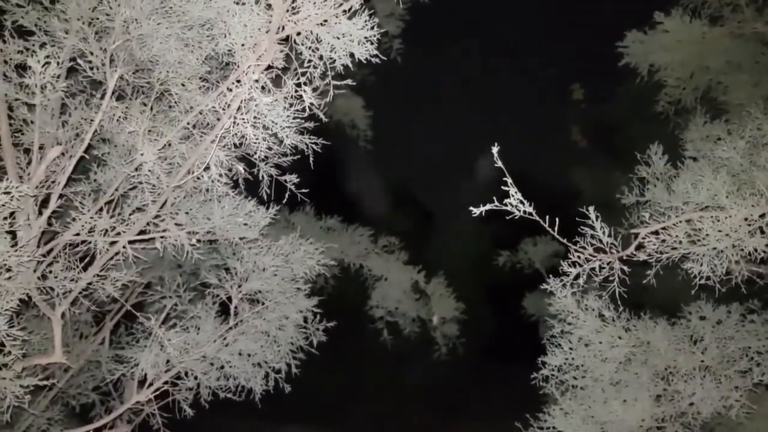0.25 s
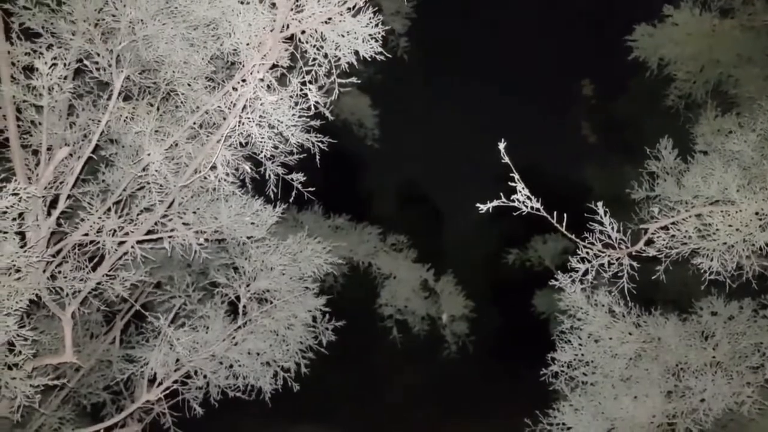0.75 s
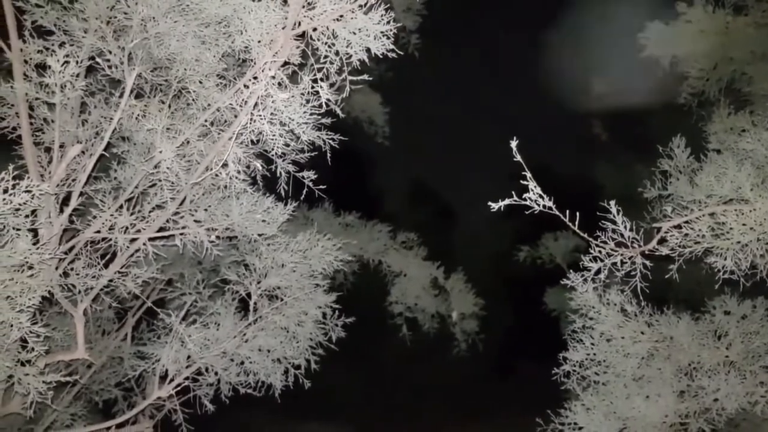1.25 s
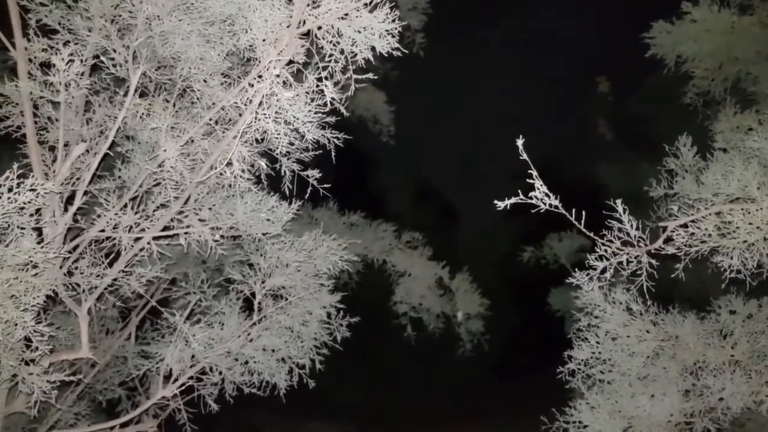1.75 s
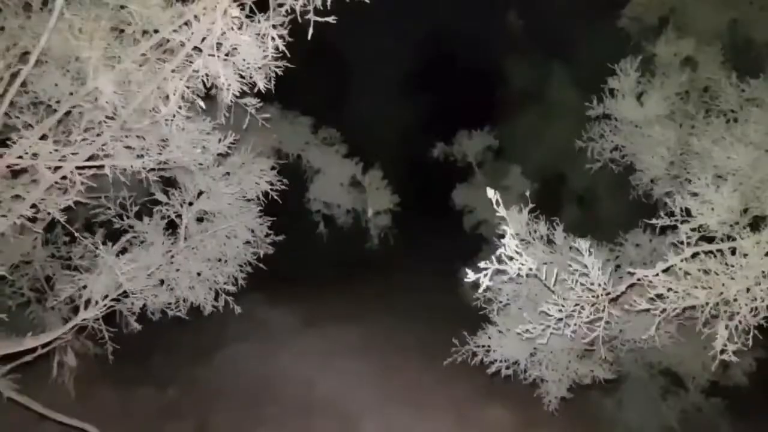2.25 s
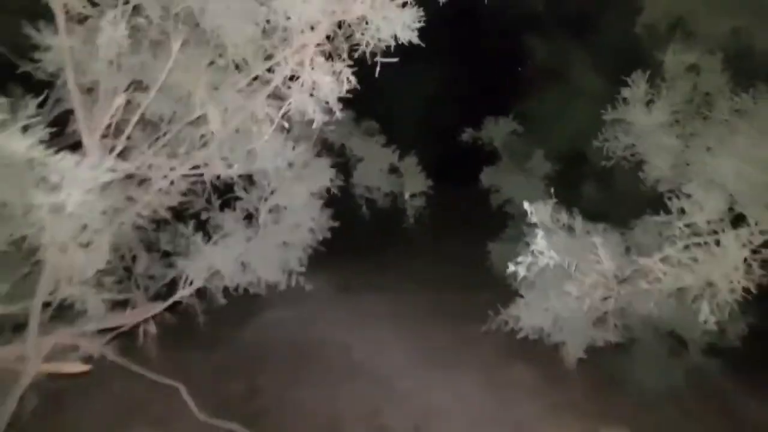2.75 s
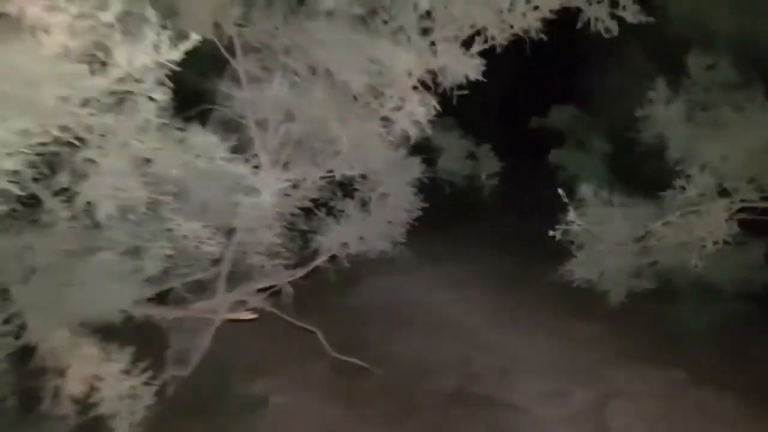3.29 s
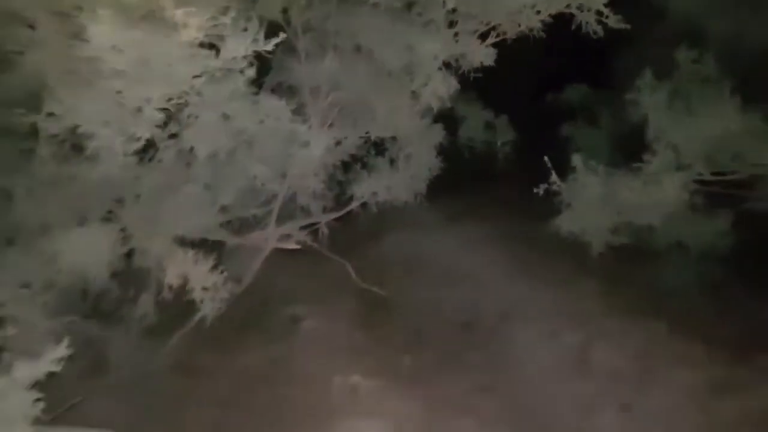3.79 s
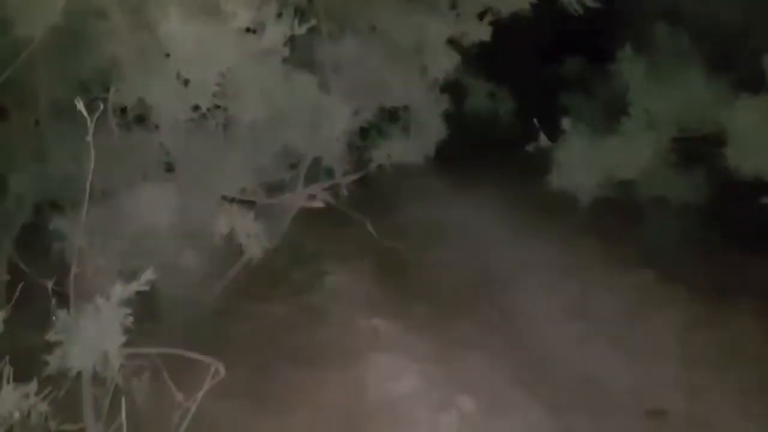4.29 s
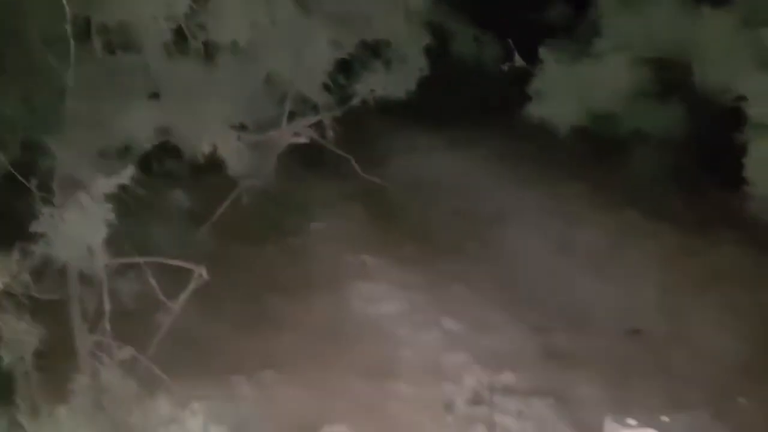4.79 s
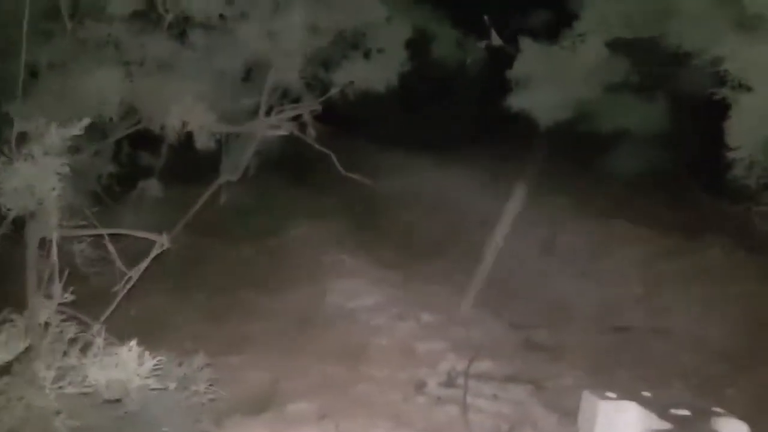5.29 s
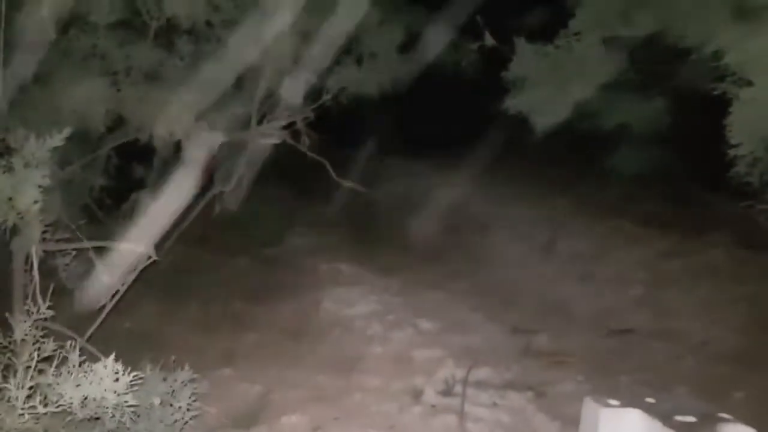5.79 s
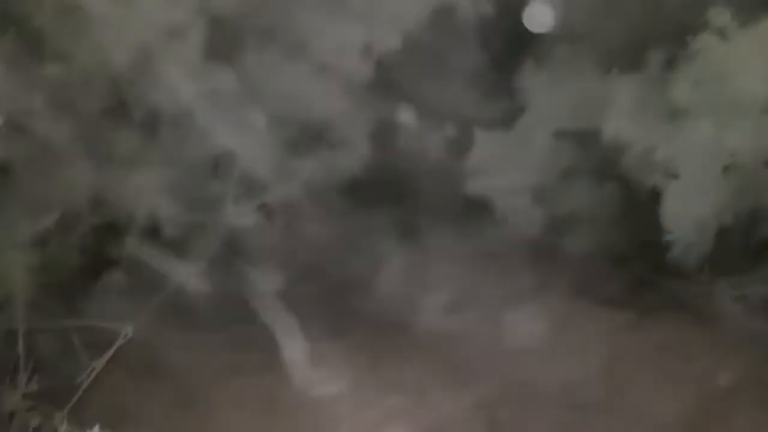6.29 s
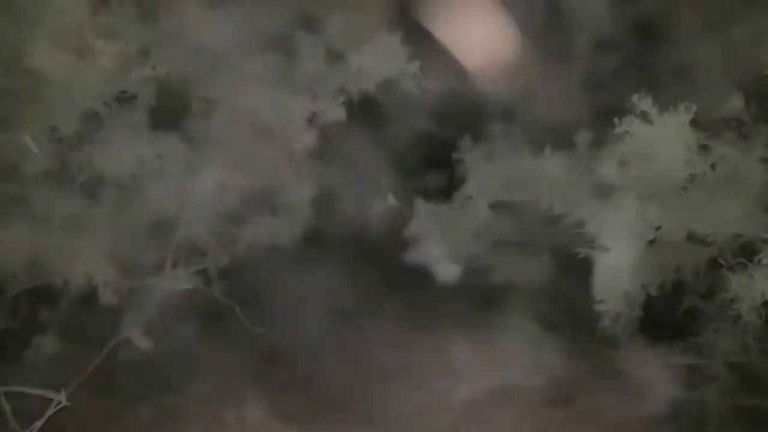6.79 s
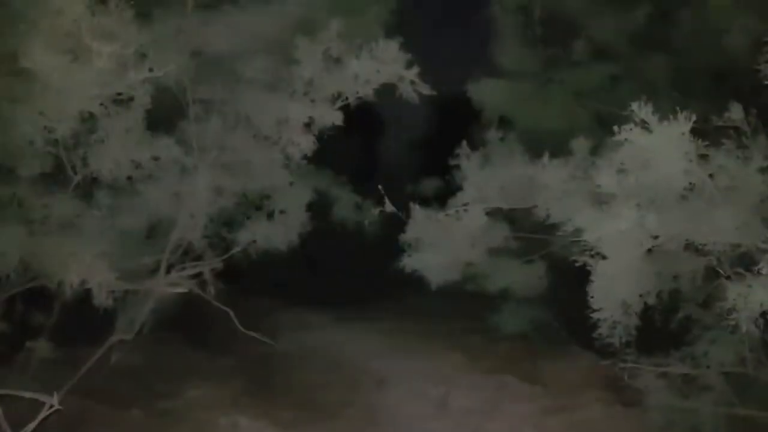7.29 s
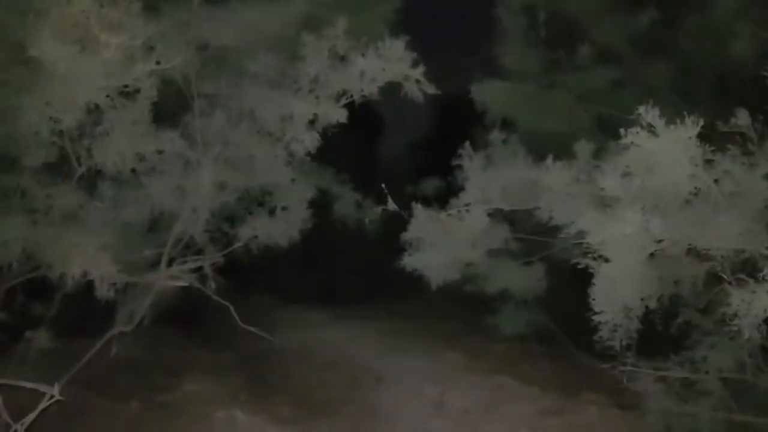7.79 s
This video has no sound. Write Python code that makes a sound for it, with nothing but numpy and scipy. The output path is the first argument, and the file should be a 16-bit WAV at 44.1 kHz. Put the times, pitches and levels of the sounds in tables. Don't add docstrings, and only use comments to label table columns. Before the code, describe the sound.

A quiet night pond among trees, heard in mono with soft air and microphone hiss. Throughout 0-8 s a blurred far crowd of frogs shimmers fast around 2-4 kHz, over a steady low cricket trill near 2 kHz, about 55 pulses a second, and a faint buzzing katydid above 10 kHz. A near peeper repeats bouts of about three to six clear whistles falling from nearly 5 to 4 kHz, roughly twice every 1.2 s. Shorter, quicker whistles cluster at 1.9-3.5 s, then scatter. Click frogs croak and tick busily until 4 s, more thinly to 6.7 s. A lower peeper gives five-note bouts at 0.2-1.7, 3.6-4.3 and after 7.4 s. Soft deeper croaks come at 1.2, 4.1-4.7 and around 6 s. A high cricket sings faintly 1.4-4.2 s and after 6.4 s; another chirps slowly. Very faint low callers appear from 5.7 s; one fuller call sounds at 7.2 s.

```python
import sys
import numpy as np
from scipy import signal
from scipy.fft import rfft, irfft
from scipy.io import wavfile
from scipy.ndimage import uniform_filter1d

SR = 44100
rng = np.random.default_rng(int(sys.argv[2]) if len(sys.argv) > 2 else 0)


def master_out(mix):
    frames = np.transpose(np.atleast_2d(mix))
    ceiling = np.clip(frames, -1, 1)
    pcm = np.round(ceiling * 32767).astype(np.int16)
    wavfile.write(sys.argv[1], SR, pcm)


N = 355005

# [f/Hz, level/dB per Hz]
AIR_COLOUR = [(20, -15), (40, -8), (70, -6.5), (135, 0), (250, -4.5), (500, -6), (800, -8.5), (1700, -5.5),
              (3200, -3.5), (5200, -9), (6200, -11.5), (7500, -23.5), (9500, -19.5), (15500, -24.5)]
# [f/Hz, width/Hz, level/dB]
WING_MODES = [
    (10790, 700, -3),
    (12000, 1000, -0.5),
    (13300, 900, -3),
    (14600, 880, -3),
]
# [t/s, strokes ahead of an even beat]
KATYDID_DRIFT = [(0, 0.31), (1.4, 1.05), (3.65, 3.05), (6.3, 2.5), (8.05, 1.47)]
# [t/s, strokes ahead of an even beat]
LOW_CRICKET_DRIFT = [(0, -0.78), (1.4, -0.31), (3.5, 0.53), (4.65, -0.89), (7, -.76), (7.7, -1.58),
                     (8.05, -1.6)]
# [first t/s, last t/s, strokes per s, level/dB]
HIGH_CRICKET_BOUTS = [(1.443, 1.51, 70, -76), (1.669, 1.824, 71, -75), (1.957, 2.212, 70.6, -74),
                      (2.356, 2.611, 70.2, -73), (2.730, 3.005, 69.2, -75), (3.153, 3.4, 68.9, -73),
                      (3.527, 3.805, 68.6, -73), (3.942, 4.233, 68.6, -72), (6.423, 6.61, 70, -77),
                      (6.765, 6.94, 69.5, -76), (7.098, 7.23, 69.7, -76), (7.313, 7.4, 69, -77),
                      (7.578, 7.77, 69.5, -76), (7.997, 8.045, 70, -76)]
SLOW_CHIRPS = [.525, 1.07, 2.878, 3.675, 4.315, 4.988, 5.622, 6.92, 7.59]
# [t/s, peepers level/dB, ticks level/dB, croaks level/dB]
CROWD_LEVELS = [(0.0, -54, -57, -67), (1.3, -53, -57.5, -66), (2.38, -52, -57.5, -69),
                (5.99, -52.5, -58.5, -67), (8.05, -52.5, -60, -70)]
# [t/s, f/Hz, fall/ms, level/dB]
FAR_CALLS = [
    (5.70, 460, 34, -73),
    (6.04, 517, 20, -72),
    (7.215, 800, 20, -70),
    (7.345, 860, 14, -71.5),
    (7.405, 530, 16, -69),
    (7.575, 548, 63, -73),
]
# [t/s, level/dB]
DEEP_CROAKS = [(1.195, -65.5), (4.113, -63.5), (4.474, -66), (4.709, -69), (5.896, -65.5), (6.168, -67),
               (6.212, -68)]
# [first tick t/s, last tick t/s, tick level/dB, croak level/dB]
DULL_RUNS = [(.068, .578, -43, -48.5), (.350, .350, -35, -58), (.641, 0.86, -34.5, -49.5),
             (.742, 1.17, -36, -55), (.911, 1.23, -37.5, -51), (1.194, 1.305, -32.5, -49),
             (1.242, 1.36, -44, -49), (1.458, 1.67, -52, -50), (1.760, 1.96, -37.5, -52),
             (1.822, 2.1, -48, -51), (2.050, 2.68, -36, -50.5), (2.459, 3.23, -37.5, -52),
             (2.662, 3.17, -39, -54), (3.032, 3.52, -33, -54), (3.419, 4, -35, -55),
             (4.078, 4.078, -35, -61), (4.240, 4.240, -54, -52), (5.572, 5.572, -36, -46.5),
             (6.169, 6.412, -32, -51), (6.538, 6.662, -34.5, -53)]
# [first tick t/s, last tick t/s, tick level/dB, croak level/dB]
SHARP_RUNS = [(.043, .155, -45, -52), (.137, .256, -41, -59), (.495, .495, -44, -55),
              (.706, 1.105, -36, -47.5), (1.420, 1.648, -36, -49), (1.939, 1.939, -47, -57),
              (1.993, 2.333, -40.5, -54.5), (2.529, 2.768, -40, -51.5), (2.900, 2.900, -38, -51),
              (4.423, 4.669, -39.5, -55), (4.934, 4.934, -41, -53), (5.037, 5.256, -39.5, -52),
              (5.370, 5.483, -38.5, -49.5), (.227, .350, -39, -58), (.273, .273, -39.5, -52),
              (.520, .520, -41, -54), (.815, .815, -39, -62), (1.289, 1.289, -52, -50),
              (2.374, 2.374, -47.5, -55), (3.550, 3.693, -39.5, -57), (3.818, 4.208, -43, -58),
              (4.845, 4.845, -48, -58), (7.578, 7.578, -44, -64), (5.553, 5.890, -42, -54),
              (6.006, 6.479, -43, -62), (5.596, 6.055, -39.5, -51), (6.603, 6.603, -40, -57)]
# [t/ms, f/Hz, level/dB, octave level/dB]
LONG_NOTE = [(0, 4900, -38, -70), (2.96, 4860, -17, -54), (8.04, 4660, -26.5, -41),
             (14.05, 4540, -16.5, -49), (19.78, 4370, -11.5, -38), (25.63, 4200, -3, -47),
             (32.6, 4065, -.5, -58), (42.6, 3930, -3, -63), (45.4, 3780, -15, -70)]
SHORT_NOTE = [(0, 4000, -18, -67), (4.04, 3930, -3.5, -31), (7.16, 3850, -3, -39), (11.06, 3790, 0.5, -39),
              (17.06, 3680, -2, -34), (21, 3630, -9.5, -29.5), (27, 3520, -13.5, -38.5),
              (30.4, 2700, -37, -43)]
LOW_NOTE = [(0, 3780, -25, -40), (4, 3700, -4, -25), (10, 3570, 0, -20), (15, 3450, -2, -21),
            (19, 3330, -5, -27), (24, 3200, -25, -42)]
# [first t/s, last t/s]
SIDE_BOUTS = [(.335, .335), (.713, .713), (0.995, 1.072), (1.736, 1.812), (2.118, 2.189), (2.447, 2.447),
              (2.875, 2.947), (3.244, 3.315), (3.627, 3.694), (3.984, 4.057), (4.714, 4.847),
              (5.113, 5.113), (5.219, 5.219), (6.093, 6.093), (6.4, 6.475), (6.864, 6.864), (7.6, 7.602)]
# [t/s, gap/s, level/dB, octave lift/dB]
LOW_BOUTS = [(.174, 0.029, -69, -12), (.448, .036, -50.5, -15), (.718, 0.039, -52, -6),
             (.996, 0.037, -49.5, -12), (1.513, .042, -53.5, 4), (3.557, 0.038, -50, -9),
             (3.833, 0.035, -52, -12), (4.107, .0365, -50, -5), (7.366, 0.04, -51, 1.5),
             (7.674, .037, -49, -3), (7.951, 0.037, -48, -5)]
# [first t/s, last t/s, level/dB, pitch factor]
SHORT_BOUTS = [(1.861, 1.861, -43, 1.02), (1.873, 1.954, -40.5, .97), (2.128, 2.293, -40, .98),
               (2.425, 2.590, -39.5, 1), (2.76, 2.884, -39.5, .99), (3.056, 3.179, -39.5, .99),
               (3.331, 3.452, -45, 1), (4.894, 4.894, -43, 1.07), (5.591, 5.591, -41, 1.09),
               (6.164, 6.164, -42, 1.01), (6.193, 6.275, -48, 1.01), (6.449, 6.450, -42.5, 0.99),
               (6.753, 6.836, -45.5, 1.02), (7.098, 7.098, -44.5, 1.02), (7.765, 7.848, -42, 0.99),
               (8.025, 8.025, -37.5, .99)]
# [first t/s, last t/s, level/dB, pitch factor]
LONG_BOUTS = [(-.007, 0.271, -39, .99), (0.6, 0.888, -39, 0.99), (1.839, 2.127, -40, 1),
              (2.565, 2.706, -39.5, 0.99), (2.999, 3.28, -40.5, 0.99), (3.574, 3.858, -40, .992),
              (4.163, 4.453, -40.5, 1), (4.75, 5.104, -42, 1.018), (5.392, 5.671, -39, 1.01),
              (5.966, 6.249, -39.5, 1), (6.553, 6.839, -38.5, 1), (7.154, 7.508, -39, 1.003),
              (7.806, 8.02, -40.5, 1.006)]

LONG_GAP_S, SHORT_GAP_S, TICK_GAP_S = 0.071, 0.0413, 0.12


def gain_of(db):
    return 10 ** (np.asarray(db) / 20)


def evened(x):
    return x / np.sqrt(np.mean(x ** 2) + 1e-20)


def column(rows, count):
    rows = np.transpose(rows)
    return np.interp(np.arange(N) / SR, rows[0], rows[count])


def add(mix, s, sound):
    at = round(s * SR)
    sound = sound[max(-at, 0):]
    part = mix[max(at, 0):][:len(sound)]
    part += sound[:len(part)]


def beats(first, last, gap, slowing=0.98):
    steps = np.linspace(0, 1, round((last - first) / gap) + 1)
    return first + (last - first) * steps ** slowing


def bouts(per_s, bouts_per_s, duty, spread_db):
    start, pace = rng.random(2)
    size, step, tune, turn = rng.standard_normal((260, 4)).T
    s = np.cumsum(1 + 0.04 * step) / (per_s * (0.9 + 0.2 * pace)) - 0.1 * (1 + start)
    cycle = bouts_per_s * (0.8 + 0.4 * pace) * s + start + 0.03 * np.cumsum(tune)
    singing = (cycle % 1 < duty) & (s < N / SR)
    return np.transpose([s, gain_of(spread_db * size), tune, turn])[singing]


def strokes(turns, spread_db):
    whole = np.floor(turns)
    return (np.diff(whole, prepend=whole[0]) > 0) * gain_of(spread_db * rng.standard_normal(N))


def blip(hz, rise_ms, fall_ms, glide=0.0, turn=0.0):
    t = np.arange(int((rise_ms + 5 * fall_ms) * SR / 1000)) * 1000 / SR
    rise = np.sin(np.pi / 2 * np.minimum(t / rise_ms, 1)) ** 2
    fall = np.exp(-np.maximum(t - rise_ms, 0) / fall_ms)
    return rise * fall * np.sin(2 * np.pi * (np.cumsum(hz * (1 + glide * t)) / SR + turn))


def note(shape, factor, turn=0.0, octave_db=0.0, evenness=0.0):
    ms, *columns = np.transpose(shape)
    t = np.arange(ms[0], ms[-1], 1000 / SR)
    hz, db, octave = (np.interp(t, ms, c) for c in columns)
    phase = 2 * np.pi * (np.cumsum(hz * factor) / SR + turn)
    whistle = gain_of(db * (1 - evenness)) * np.sin(phase)
    overtone = gain_of(octave + octave_db) * np.sin(2 * phase)
    return signal.windows.tukey(len(t), 0.15) * (whistle + overtone)


def trees(x, t60, wet_db):
    at, out = np.arange(60, 9000, 20), x.copy()
    for k in range(3):
        taps = np.zeros(9100)
        signs = rng.choice([-1.0, 1.0], len(at))
        taps[at + rng.integers(0, 20, len(at))] = signs * gain_of(-60 * at / SR / t60)
        share = np.sqrt(2 / 3) * np.cos(np.pi * (4.3 * np.arange(N) / SR + k / 3))
        wet = gain_of(wet_db) * signal.oaconvolve(x * share, taps / np.linalg.norm(taps))
        out += wet[:N]
        add(out, 0, wet[N:])
    return out


def air():
    hz, (f, db) = np.fft.rfftfreq(N, 1 / SR), np.transpose(AIR_COLOUR)
    colour = gain_of(np.interp(np.log(hz + 1), np.log(f), db))
    return gain_of(-66.5) * evened(irfft(rfft(rng.standard_normal(N)) * colour, N))


def katydid():
    turns = 122.4 * np.arange(N) / SR + column(KATYDID_DRIFT, count=1)
    out = np.zeros(N)
    for hz, width, db in WING_MODES:
        since = (turns + 0.082 + 0.059 * (hz - 12000) / 1000) % 1
        teeth = 0.38 + np.minimum(since / 0.053, np.exp(-(since - 0.04) / 0.17))
        band = signal.butter(2, [hz - width / 2, hz + width / 2], "bandpass", fs=SR, output="sos")
        out += gain_of(db) * evened(signal.sosfilt(band, teeth * rng.standard_normal(N)))
    swell = evened(uniform_filter1d(uniform_filter1d(rng.standard_normal(N), 3000), 3000))
    return gain_of(-75.5 + swell) * evened(out)


def low_cricket():
    jitter = 0.04 * evened(uniform_filter1d(rng.standard_normal(N), 800))
    turns = 55 * np.arange(N) / SR + column(LOW_CRICKET_DRIFT, count=1) + 0.2 + jitter
    ring = blip(2070, 4.0, 2.8, -0.001)
    return gain_of(-54.5) * signal.oaconvolve(strokes(turns, 2.5), ring)[:N]


def high_cricket():
    out = np.zeros(N)
    for first, last, per_s, db in HIGH_CRICKET_BOUTS:
        for s in np.arange(first, last, 1 / per_s):
            size = gain_of(db + 4 + rng.standard_normal())
            add(out, s - 0.002, size * blip(7020, 2.6, 2, -0.002, rng.random()))
    return out


def slow_cricket():
    out = np.zeros(N)
    for s in SLOW_CHIRPS:
        for later, hz, lift_db in ((0, 6370, 4), (0.017, 6700, -1), (0.04, 6580, -1.5), (0.072, 6620, -6)):
            add(out, s + later, gain_of(-72 + lift_db) * blip(hz, 6.0, 6.7))
    return out


def crickets():
    return trees(low_cricket(), 0.15, -6) + trees(high_cricket() + slow_cricket(), 0.1, -11)


def crowd(count=12):
    peeps, ticks, croaks = np.zeros((3, N))
    for place, far in zip(np.linspace(-1, 1, count), rng.random(count)):
        for s, gain, tune, turn in bouts(24.5, 3.0, 0.7, 1.53):
            size = gain * gain_of(-7.0 * far - 9.1 * place ** 2)
            add(peeps, s, size * note(SHORT_NOTE, 1.035 + 0.0928 * place + 0.0066 * tune, turn, -2.5))
        for s, gain, tune, turn in bouts(15.0, 1.5, 0.92, 1.6):
            size = gain * gain_of(-9.0 * far)
            add(croaks, s, size * blip(1320 + 55 * place + 35 * tune, 5.0, 2.0, -0.002, turn))
            low = blip(2370 + 90 * place + 170 * tune, 1.53, 1.31, turn=turn)
            high = gain_of(-10 + 2 * tune) * blip(2950 + 110 * turn, 1.1, 0.6, turn=tune)
            add(ticks, s + 0.01, size * low)
            add(ticks, s + 0.01, size * high)
    peeps = gain_of(column(CROWD_LEVELS, count=1)) * evened(trees(peeps, 0.27, -6.0))
    ticks = gain_of(column(CROWD_LEVELS, count=2) + 2.3) * evened(trees(ticks, 0.16, -1))
    croaks = gain_of(column(CROWD_LEVELS, count=3) + 2.0) * evened(trees(croaks, 0.21, -5.0))
    return peeps + ticks + croaks


def odd_callers():
    out = np.zeros(N)
    for s, hz, fall_ms, db in FAR_CALLS:
        add(out, s - 0.02, gain_of(db) * blip(hz, 20, fall_ms, -0.00069))
    for s, db in DEEP_CROAKS:
        add(out, s - 0.012, gain_of(db) * blip(1000, 8.8, 8.8, -0.005))
    fuller = gain_of(-34) * blip(2415, 3.5, 4.0) + gain_of(-43) * blip(2860, 3.5, 4.0, -0.004)
    add(out, 7.156, fuller)
    return out


def click_frogs(runs, low_db, high_db):
    out = np.zeros(N)
    for first, last, db, croak_db in runs:
        times = beats(first, last, TICK_GAP_S)
        for s, (turn, tune, a, b) in zip(times, rng.random((len(times), 4))):
            low = gain_of(db + low_db + 2 * a - 1)
            high = gain_of(db + high_db + 2 * b - 1)
            low_ring = gain_of(-1.0) * blip(2540 * (0.956 + 0.12 * tune), 1.5, 1.0, turn=turn)
            high_ring = gain_of(0.5) * blip(3080 * (0.935 + 0.038 * turn), 1.08, 0.66, turn=tune)
            croak = blip(1330 * (0.96 + 0.08 * tune), 5.0, 2.2, -0.002, turn)
            add(out, s - 0.0012, low * low_ring)
            add(out, s - 0.0011, high * high_ring)
            add(out, s - 0.014, gain_of(croak_db + 0.95) * croak)
    return out


def side_peeper():
    out = np.zeros(N)
    for first, last in SIDE_BOUTS:
        for s in beats(first, last, LONG_GAP_S):
            add(out, s - 0.006, gain_of(-62) * note(LONG_NOTE, 1.005, rng.random(), -6, 0.8))
    return out


def low_peeper():
    out = np.zeros(N)
    for s, gap, db, octave_db in LOW_BOUTS:
        for k, (size, turn) in enumerate(rng.standard_normal((5, 2))):
            whistle = note(LOW_NOTE, 0.99, turn, octave_db)
            add(out, s - 0.016 + k * gap, gain_of(db + 0.74 * size) * whistle)
    return out


def near_peepers(rows, note_shape, gap, slowing, hurry_ms):
    opening_db, uneven_db, detune = -2.0, 0.92, 0.006
    out = np.zeros(N)
    for first, last, db, factor in rows:
        times = beats(first, last, gap, slowing)
        for k, (s, (size, tune, turn)) in enumerate(zip(times, rng.standard_normal((len(times), 3)))):
            hurry = hurry_ms * 0.5 ** k
            shape = [(ms + hurry * max(1 - ms / 20, 0), *rest) for ms, *rest in note_shape]
            gain = gain_of(db + opening_db * (k == 0) + uneven_db * size)
            add(out, s + shape[0][0] / 1000, gain * note(shape, factor + detune * tune, turn))
    return out


def peepers():
    short = near_peepers(SHORT_BOUTS, SHORT_NOTE, SHORT_GAP_S, slowing=0.98, hurry_ms=0.0)
    long = near_peepers(LONG_BOUTS, LONG_NOTE, LONG_GAP_S, slowing=1.03, hurry_ms=7.0)
    return trees(side_peeper() + low_peeper() + short + long, 0.13, -11.5)


def scene():
    dull = click_frogs(DULL_RUNS, low_db=-0.5, high_db=-13)
    sharp = click_frogs(SHARP_RUNS, low_db=0.0, high_db=0.5)
    frogs = trees(odd_callers() + dull + sharp, 0.05, -13)
    return (air() + katydid() + crickets() + crowd() + frogs + peepers())[None]


def band_limit(x):
    return signal.sosfilt(signal.butter(12, 15550, fs=SR, output="sos"), x)


def record(dry):
    mix = dry - 0.0004
    return band_limit(mix)


dry = scene()
out = record(dry)
master_out(out)
```